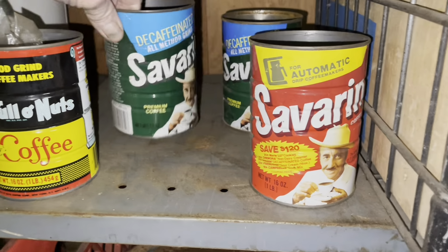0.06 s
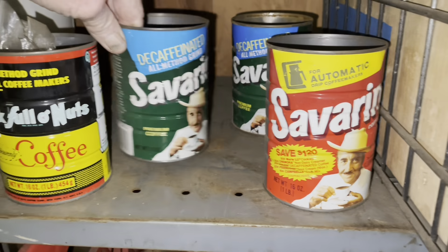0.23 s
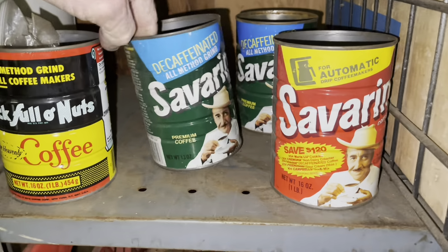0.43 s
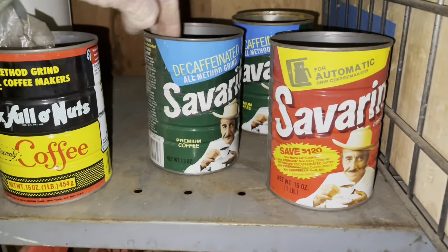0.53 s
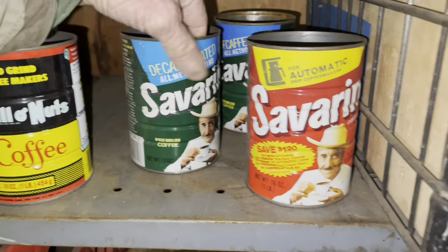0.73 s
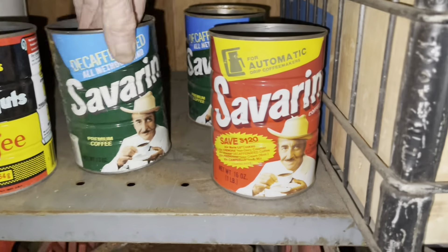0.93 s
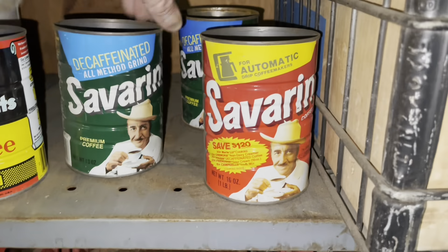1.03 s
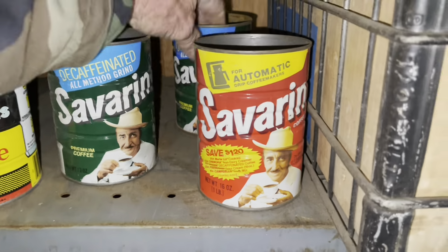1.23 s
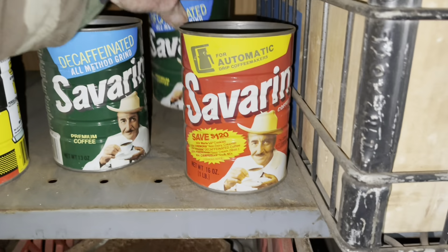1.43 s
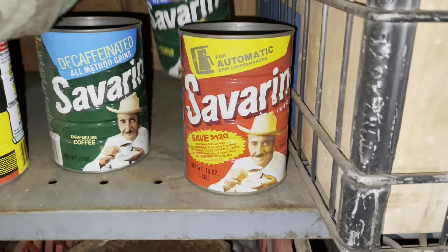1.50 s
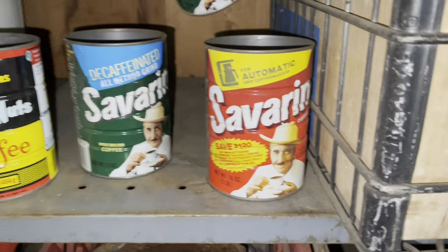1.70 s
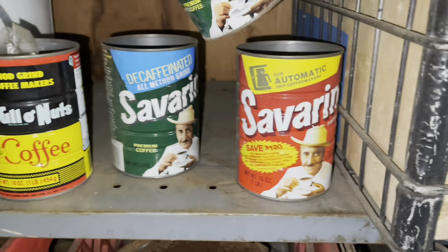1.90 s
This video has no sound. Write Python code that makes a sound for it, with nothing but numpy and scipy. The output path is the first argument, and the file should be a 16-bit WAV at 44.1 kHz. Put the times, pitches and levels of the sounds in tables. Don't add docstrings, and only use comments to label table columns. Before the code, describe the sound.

Hollow metal cans being set down and slid about on a sheet-steel shelf, with clunks and ticks

```python
import sys
import numpy as np
from scipy import signal
from scipy.fft import rfft, irfft, next_fast_len
from scipy.io import wavfile
from scipy.ndimage import uniform_filter1d

SR = 44100
rng = np.random.default_rng(int(sys.argv[2]) if len(sys.argv) > 2 else 0)


def nominal_scale(level):
    x = np.asarray(level, float) / 20
    return 10 ** x


def unload_wav(signal):
    wavfile.write(
        sys.argv[1],
        SR,
        np.round(np.clip(np.atleast_2d(signal).T, -1, 1) * 32767).astype(np.int16),
    )


N = 85995

SCATTER_DB, DETUNE, SHELF_DETUNE = 3, 0.0085, 0.05
SHELF_T60 = 0.25

# (time [s], hollow level [dB], then relative to it: wall, shelf, sheet [dB])
IMPACTS = [(0.172, -16.5, -8.5, -10, -31.5), (0.229, -31, -17.5, -22, -33), (0.369, -9.5, -5, -10.5, -17.5),
           (0.377, -10, -9, -14, -20.5), (0.407, -22.5, -5, -4.5, -10.5), (0.519, -23.5, -3.5, -4, -6.5),
           (0.55, -21, -13, -5, -16.5), (0.588, -26, -3, 5, -12.5), (0.762, -20.5, -15, 0, -15.5),
           (0.814, -19.5, -2.5, -17, -15), (0.847, -30.5, -4, 4.5, -11), (0.907, -24.5, -2, -10, -15),
           (0.926, -11.5, -22, -8, -14.5), (0.959, -21.5, 0.5, -22, -39), (0.993, -16, -10, -4, -14.5),
           (1.027, -18.5, -20, -3, -19), (1.037, -17, -2, -6.5, -8), (1.131, -17.5, -7, -0.5, -10),
           (1.189, -30, 3.5, 6, -6), (1.243, -16.5, -15.5, -11, -21.5), (1.277, -28, -11, 4.5, -18),
           (1.357, -15, -2, -6, -9), (1.37, -14.5, -11, -7.5, -16), (1.409, -27.5, 1, -2, -11)]
# (time [s], level [dB],
# frequency [Hz], t60 [s])
BASE_POPS = [(0.1723, -27.5, 2190, 0.012), (1.3555, -12, 980, 0.026), (1.3565, -20.5, 840, 0.088),
             (1.518, -17, 556, 0.025), (1.5189, -21.5, 950, 0.0074), (.368, -24, 603, 0.041),
             (.371, -25.5, 158, 0.096), (.421, -28, 580, 0.032), (.441, -26.5, 468, 0.065),
             (.512, -22, 493, .05), (.522, -12, 562, 0.047), (0.524, -23, 118, 0.13),
             (.568, -24.5, 542, 0.087), (.596, -36, 208, 0.021), (.612, -27.5, 430, 0.11),
             (.756, -25, 470, .05), (0.944, -15, 429, 0.042), (0.954, -12.5, 456, 0.044),
             (.992, -16, 572, 0.09), (1.074, -15.5, 477, 0.039), (1.158, -19.5, 543, 0.072),
             (1.175, -17, 191, 0.063), (1.205, -25, 230, 0.24), (1.233, -18.5, 536, 0.064),
             (1.307, -23.5, 586, 0.026), (1.356, -16.5, 560, 0.072), (1.359, -27, 1229, 0.059),
             (1.367, -21, 145, 0.086), (1.389, -15.5, 543, 0.06), (1.402, -15, 613, .04),
             (1.414, -8, 480, 0.017), (1.415, -14, 201, 0.03), (1.432, -20, 463, 0.037),
             (1.447, -20.5, 480, .04), (1.462, -30.5, 557, 0.092), (1.475, -28, 156.6, 0.31),
             (1.54, -50.5, 773, 0.22), (.2, -57, 3236, 0.8), (1.5, -63, 1470, .4), (1.519, -62, 1565, .4),
             (1.43, -55.5, 1780, 0.47), (1.845, -65, 3540, 0.2), (0.934, -21, 438, 0.059),
             (1.047, -11, 502, 0.042), (1.146, -20, 472, 0.056), (1.11, -32, 92, 0.26)]
# (frequency [Hz], level [dB], t60 [s])
HOLLOW_MODES = [(451.1, 1.5, 0.45), (465.5, 10.5, 0.14), (496.4, -0.5, 0.18)]
# (frequency [Hz], level [dB], t60 [s])
WALL_MODES = [(539.5, -1.5, 0.34), (589, -0.5, 0.35), (606, 2, 0.12), (640, -61, 0.013)]
# (frequency [Hz], level [dB])
SHELF_MODES = [(60, -8), (114, -3), (148, -3), (180, -1.5), (213, -2.5), (241, 2.5), (262, -2), (305, -9),
               (350, -8.5), (405, -17)]


def knocks():
    out = np.zeros(N)
    t = np.arange(SR // 2 + 1) / SR
    seat, panel_rise, at_once = seated(), np.minimum(t / 0.012, 1), np.ones(len(t))
    for s, db, wall_db, shelf_db, sheet_db in IMPACTS:
        bodies = [(HOLLOW_MODES, 0, seat, DETUNE),
                  (WALL_MODES, wall_db, seat, DETUNE),
                  (lasting(SHELF_MODES, SHELF_T60), shelf_db, panel_rise, SHELF_DETUNE),
                  (sheet(), sheet_db, at_once, DETUNE)]
        for modes, relative_db, envelope, detune in bodies:
            wave = ring(modes, SCATTER_DB, detune)
            add(out, s, nominal_scale(db + relative_db) * envelope[:len(wave)] * wave)
    for s, db, hz, t60 in BASE_POPS:
        add(out, s, nominal_scale(db) * ring([(hz, 0, t60)]))
    return out


def seated():
    swell_s, hold_s, seat_s, seat_db = 0.0024, 0.016, 0.011, -6.5
    t = np.arange(SR // 2 + 1) / SR
    return (1 - np.exp(-t / swell_s)) * nominal_scale(seat_db * np.clip((t - hold_s) / seat_s, 0, 1))


def sheet(count=70):
    low_hz, top_hz, tilt_db = 689, 3277, -8
    low_t60, top_t60 = 0.26, 0.067
    height = rng.random(count)
    hz = low_hz * (top_hz / low_hz) ** height
    t60 = low_t60 + (top_t60 - low_t60) * height
    return np.transpose([hz, tilt_db * height, t60])


def ring(modes, scatter_db=0., detune=0.):
    push_s, in_step_hz = 0.0018, 1450
    hz, db, t60 = np.transpose(modes)[:, :, None]
    t = np.arange(0, min(t60.max(), .5), 1 / SR)
    luck = rng.standard_normal((3, len(modes), 1))
    size = nominal_scale(db + scatter_db * luck[0])
    phase = 2 * np.pi * hz * (1 + detune * luck[1]) * t + luck[2] * hz / in_step_hz
    wave = (size * nominal_scale(-60 * t / t60) * np.sin(phase)).sum(0)
    return wave * np.minimum(t / push_s, 1) / np.sqrt((size ** 2).sum())


def lasting(lines, t60):
    return [(hz, db, t60) for hz, db in lines]


# (time [s], grit level [dB], hollow level [dB], shelf rumble level [dB])
SLIDING = [(0, -58, -52, -59.5), (.15, -58.5, -54.5, -61), (.24, -61.5, -74, -54), (0.338, -60.5, -52, -73),
           (0.418, -59, -42, -46), (.47, -54, -56, -42), (.53, -47.5, -32, -36), (.59, -74, -44, -43.5),
           (.66, -70, -35, -49), (.745, -53, -44.5, -49.5), (0.768, -42.5, -31.5, -43),
           (.87, -43.5, -35, -31.5), (1.0, -47, -41, -33.5), (1.109, -58.5, -37.5, -41),
           (1.17, -52.5, -32.5, -38), (1.339, -51.5, -39, -39), (1.418, -72.5, -38, -41),
           (1.52, -71, -63, -41), (1.95, -69, -60.5, -66.5)]
# (frequency [Hz], level [dB])
RIM_MODES = [(3165, 2), (3811, -2.5), (4430, 0.5), (4592, -2), (5787, 1), (6288, 4), (6890, 2.5), (8672, 8),
             (8931, 8)]


def slide():
    s, *levels = np.transpose(SLIDING)
    grit, hollow, rumble = (nominal_scale(np.interp(np.arange(N) / SR, s, db)) for db in levels)
    spots = 4
    spot = np.repeat(rng.integers(0, spots, N // 2000 + 1), 2000)[:N]
    clump_db, clump_s = 2.5, 0.005
    clumps = nominal_scale(clump_db * evened(uniform_filter1d(rng.standard_normal(N), round(clump_s * SR))))
    fine = evened(clumps * clicks(5000, 1.5))
    coarse = clicks(260, 6)

    def through(drive, level, modes, detune=DETUNE):
        out = np.zeros(N)
        for k in range(spots):
            body = ring(modes, SCATTER_DB, detune)
            force = drive * level * (spot == k)
            out += signal.fftconvolve(force, body / np.linalg.norm(body))[:N]
        return out

    can = through(coarse, hollow, HOLLOW_MODES + WALL_MODES)
    shelf = through(coarse[::-1], rumble, lasting(SHELF_MODES, SHELF_T60), SHELF_DETUNE)
    rim = nominal_scale(-5) * through(fine, grit, lasting(RIM_MODES, 0.097))
    thin_sheet = nominal_scale(-6) * through(coarse, grit, sheet())
    return fine * grit, can + shelf + rim + thin_sheet


def clicks(per_s, spread_db):
    size = nominal_scale(spread_db * np.minimum(rng.exponential(1, N), 4)) * rng.choice([-1, 1], N)
    return evened(size * (rng.random(N) < per_s / SR))


# (time [s], level [dB], tail t60 [s])
RIM_TICKS = [(0.1702, -21, 0.05), (0.3674, -30.5, 0.16), (0.379, -27.5, 0.12), (0.5206, -33.5, 0.051),
             (0.5714, -34.5, 0.18), (0.704, -40, 0.15), (0.7523, -31, 0.27), (.8212, -33, 0.14),
             (0.9007, -32, 0.08), (1.2457, -36, 0.17), (0.8528, -23, 0.11), (0.925, -23, 0.16),
             (1.038, -16.5, 0.071), (1.1268, -28.5, 0.29), (1.1398, -23.5, 0.14), (1.3568, -23.5, 0.086),
             (1.3656, -28, 0.12), (1.389, -41, 0.11), (1.516, -58, 0.044), (1.7931, -49.5, 0.099)]


def ticks():
    rise_s, crack_t60, tail_share = 0.0049, 0.0048, 0.54
    fizz, rings = np.zeros(N), np.zeros(N)
    t = np.arange(SR // 3) / SR
    for s, db, t60 in RIM_TICKS:
        decay = nominal_scale(-60 * t / crack_t60) + tail_share * nominal_scale(-60 * t / max(t60, .02))
        shape = np.minimum(t / rise_s, 1) * decay
        add(fizz, s, nominal_scale(db - 2.5) * shape * rng.standard_normal(len(t)))
        add(rings, s, nominal_scale(db - 6) * ring(lasting(RIM_MODES, 0.035), 3., 0.0034))
    return fizz, rings


# (frequency [Hz], level per Hz [dB])
CONTACT_COLOUR = [(900, -0.5), (2700, -10), (3900, 1.5), (5600, -6), (9000, -3), (12100, -7.5),
                  (12900, -43), (16000, -39)]


def contact_noise(x):
    grid = np.linspace(0, SR / 2, 500)
    norm = np.sqrt(np.mean(nominal_scale(read(CONTACT_COLOUR, grid)) ** 2))
    return coloured(patchy(x), lambda hz: nominal_scale(read(CONTACT_COLOUR, hz)) * (hz > 700) / norm)


def patchy(x):
    z = signal.stft(x, nperseg=256)[2]
    across_hz = uniform_filter1d(rng.standard_normal(z.shape), size=5, axis=0)
    patches = evened(uniform_filter1d(across_hz, size=6, axis=1))
    return signal.istft(z * nominal_scale(4.5 * patches), nperseg=256)[1][:N]


# (frequency [Hz], level [dB], t60 [s])
CLINK_MODES = [(3015, -22, .3), (3752, -11, .24), (3920, -7, .06), (4110, -5, .07), (4557, -12, .37),
               (5206, -17, .2), (5561, -15, .25), (6133, -6, .23), (7050, -8, .15), (7607, -10, .14),
               (8290, -14, .1), (8745, -6, .15), (9130, -3, .065), (11140, -17, .07)]
# (frequency [Hz], level [dB], t60 [s])
FREE_MODES = [(458, 12, .8), (603, 2, .6), (1303, 4, .9), (3171, -6, 1.5), (3801, -2, 0.3), (4600, -9, 0.5),
              (6907, -8, 0.4)]
# (time [s], level [dB])
FREE_RINGS = [
    (0, -47),
    (.1, -57.5),
    (.22, -57.5),
    (0.701, -56),
]


def clink():
    start_s, damped_s, damp_t60 = 1.039, 1.4, 0.04
    out, wave = np.zeros(N), ring(CLINK_MODES)
    late = np.maximum(np.arange(len(wave)) / SR - (damped_s - start_s), 0)
    add(out, start_s, nominal_scale(-22 - 60 * late / damp_t60) * wave)
    for s, db in FREE_RINGS:
        add(out, s, nominal_scale(db) * ring(FREE_MODES, 2.8))
    return out


# (frequency [Hz], level [dB])
PORT_LEAN = [(100, -.5), (650, -.5), (1200, .5), (5000, .5), (9000, .1)]
# (frequency [Hz], phase [radians])
PORT_LEAD = [(100, .1), (1000, .35), (4000, .8), (9000, 1.6), (13000, 1.1)]


def two_ports(x):
    side = np.array([[1], [-1]])
    return coloured(x[None], lambda hz: nominal_scale(side * read(PORT_LEAN, hz)) * np.exp(.5j * read(PORT_LEAD, hz) * side))


# (frequency [Hz], t60 [s])
ROOM_DECAY = [(150, 0.92), (500, 0.17), (1500, 0.37), (4000, 0.24), (10000, 0.21)]
# (frequency [Hz], level [dB])
ROOM_LEVEL = [(150, -22.5), (500, -14.5), (1200, -1.5), (4500, -3), (9000, -13.5)]


def garage(x):
    taps = np.zeros((2, SR // 2))
    slots = np.arange(120, SR // 2 - 20, 20)
    at = slots + rng.integers(0, 20, (2, len(slots)))
    np.put_along_axis(taps, at, rng.choice([-1., 1.], (2, len(slots))), 1)
    hz, t, z = signal.stft(taps, SR, nperseg=256)
    tail = signal.istft(z * nominal_scale(-60 * t / read(ROOM_DECAY, hz)[:, None]), SR, nperseg=256)[1]
    wet = signal.fftconvolve(x[None], tail / np.linalg.norm(tail[0]), axes=1)[:, :N]
    return coloured(wet, lambda f: nominal_scale(read(ROOM_LEVEL, f)))


# (frequency [Hz], level per Hz [dB])
AIR_COLOUR = [(15, -62), (25, -58), (44, 8), (186, -5.5), (243, -3.5), (729, -84), (856, -32.5),
              (9020, -39), (15000, -99)]
# (frequency [Hz], coherence [0-1])
AIR_LIKENESS = [(50, 0.99), (400, 0.94), (1500, 0.13), (5000, 0.2), (9000, 0.46)]


def air():
    def likeness(hz):
        return np.clip(read(AIR_LIKENESS, hz), 0, 1)

    left, fresh = rng.standard_normal((2, N))
    right = coloured(left, likeness) + coloured(fresh, lambda hz: np.sqrt(1 - likeness(hz) ** 2))
    both = coloured(np.array([left, right]), lambda hz: nominal_scale(read(AIR_COLOUR, hz)) * (hz > 20))
    return nominal_scale(-48) * evened(both)


def evened(x):
    return x / np.sqrt(np.mean(x ** 2) + 1e-20)


def read(points, hz):
    f, value = np.transpose(points)
    return np.interp(np.log(hz + 1), np.log(f + 1), value)


def add(mix, s, sound):
    part = mix[max(round(s * SR), 0):][:len(sound)]
    part += sound[:len(part)]


def coloured(x, gain):
    size = next_fast_len(x.shape[-1] + 2048)
    return irfft(rfft(x, size) * gain(np.fft.rfftfreq(size, 1 / SR)), size)[..., :x.shape[-1]]


# (low edge [Hz], top edge [Hz], cells muted [%], bar follows loudness [0-1])
TREBLE_GATES = [(9600, 13200, 36, .8), (13200, 17000, 97, .3)]


def gated(x):
    hz, _, z = signal.stft(x, SR, nperseg=2048, noverlap=1536)
    power = (abs(z) ** 2).sum(0)
    cells = uniform_filter1d(power, size=16, axis=0)[8::16].repeat(16, axis=0)
    cells = uniform_filter1d(np.vstack([cells, cells[-1:]]), size=2, axis=1)
    keep = np.ones(cells.shape)
    for low_hz, top_hz, share, follow in TREBLE_GATES:
        band = (hz >= low_hz) & (hz < top_hz)
        level = cells[band] / (cells[band].mean(0) + 1e-20) ** follow
        keep[band] = level > np.percentile(level, share)
    return signal.istft(z * keep, SR, nperseg=2048, noverlap=1536)[1][:, :N]


def scene():
    fizz, rings = ticks()
    grit, bodies = slide()
    bright = contact_noise(fizz + grit)
    tins = knocks() + rings + bodies + bright + clink()
    return two_ports(tins) + garage(tins) + air()


def band_limit(x):
    return signal.sosfilt(signal.butter(12, 16970, fs=SR, output="sos"), x)


def record(dry):
    def notch(hz):
        return 1 - 0.89 * np.exp(-((hz - 10170) / 430) ** 2)

    def band_limits(hz):
        low_cut = hz ** 4 / (hz ** 4 + 47 ** 4)
        top_db = np.where((hz > 14500) & (hz < 15850), 17, -30)
        return low_cut * np.where(hz > 13100, nominal_scale(top_db), 1)

    mix = gated(coloured(coloured(dry, notch), band_limits))
    return band_limit(mix)


dry = scene()
out = record(dry)
unload_wav(out)
```